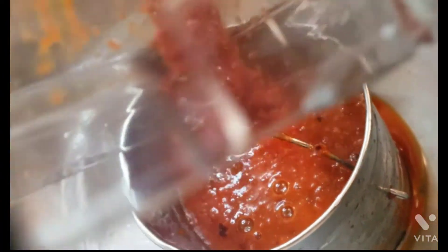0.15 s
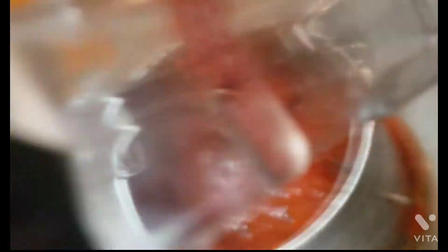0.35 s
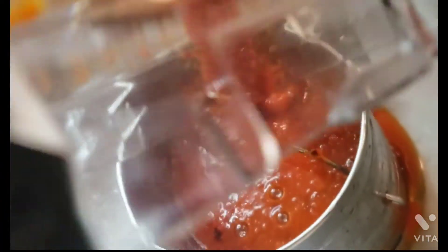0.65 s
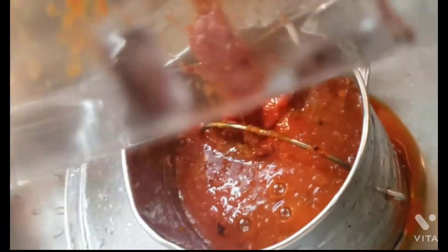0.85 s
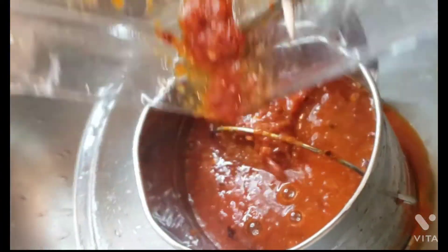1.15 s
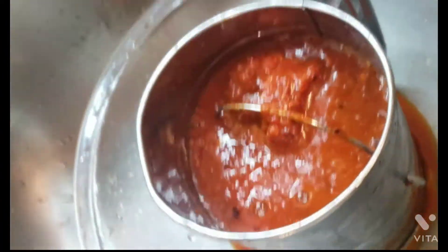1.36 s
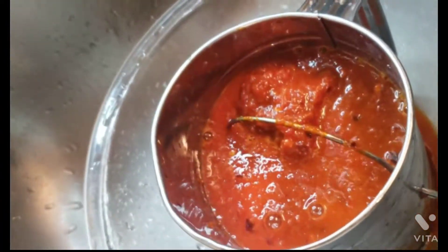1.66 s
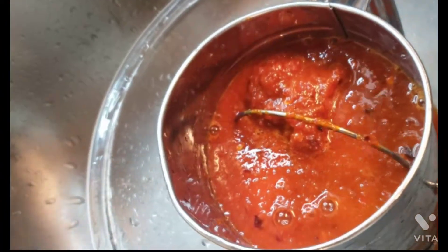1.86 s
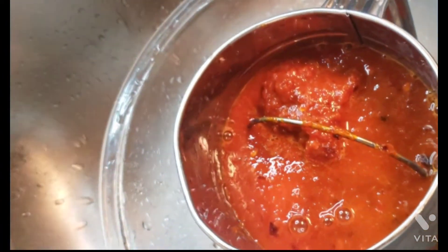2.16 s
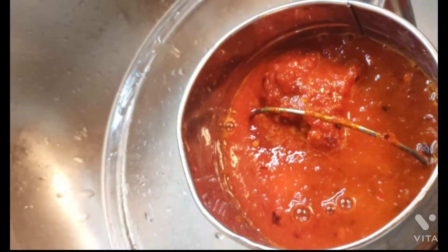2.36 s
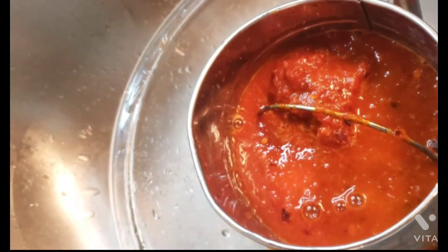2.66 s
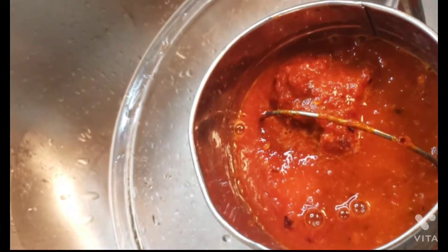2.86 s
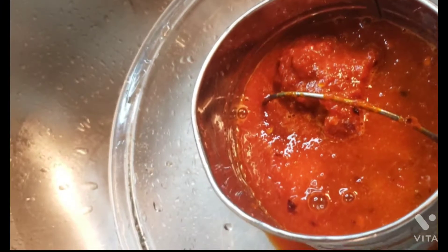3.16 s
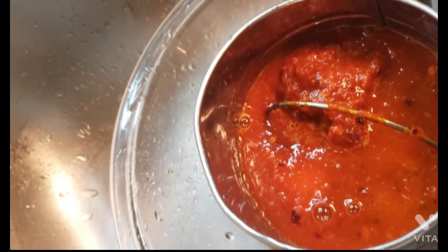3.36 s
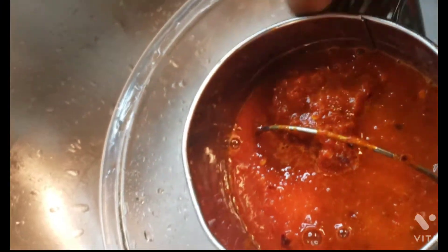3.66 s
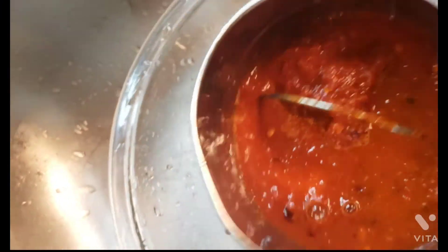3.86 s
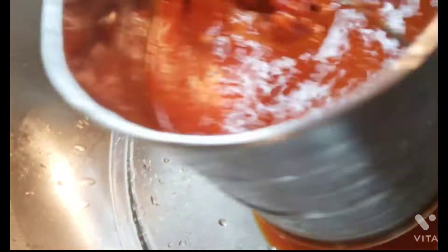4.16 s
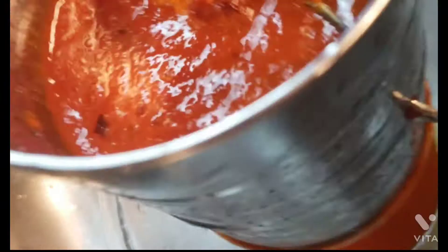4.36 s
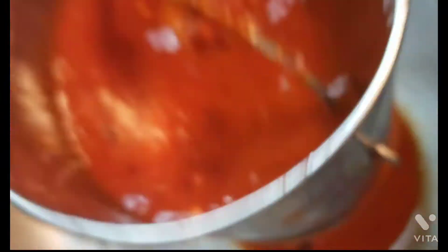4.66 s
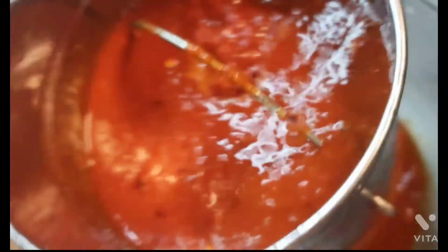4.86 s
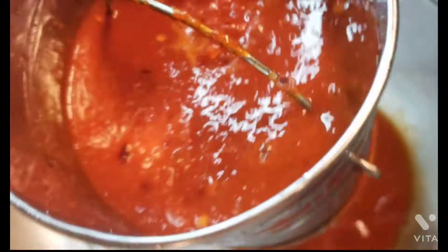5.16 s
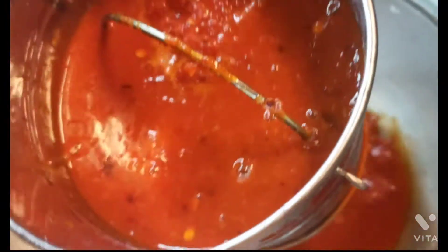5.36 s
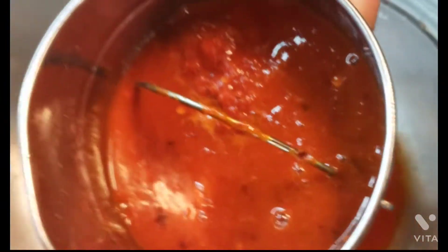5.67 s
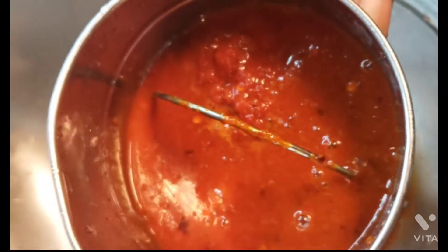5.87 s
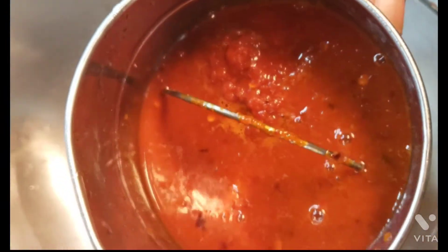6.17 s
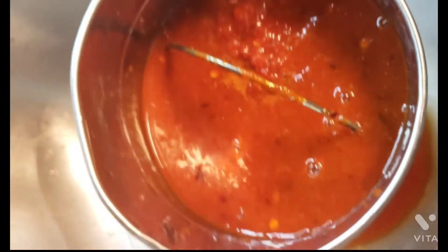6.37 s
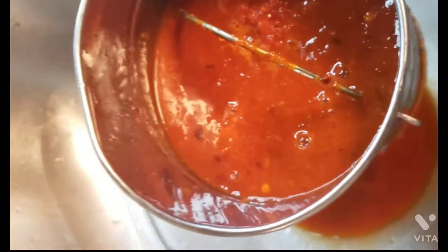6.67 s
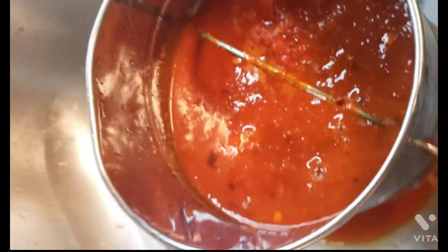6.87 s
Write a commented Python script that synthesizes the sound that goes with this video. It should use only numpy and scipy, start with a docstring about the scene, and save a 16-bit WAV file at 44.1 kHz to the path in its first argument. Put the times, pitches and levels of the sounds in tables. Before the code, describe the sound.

A steady fan-like hum and soft hiss fill a small, hard kitchen, with everything heard close. A low bump comes at the very start, and until about 1.2 seconds thick puree slides from a plastic blender jar into a metal sifter in four soft, wet rushes. At 1.3 seconds the jar lands loudly with a hollow clack and a boom from the counter. From 2.7 seconds it scrapes and knocks several times, hardest just before 3, then rocks to rest with a low rumble by 3.4. At 3.9 a glass bowl bumps the steel sink once and both ring briefly. From 4 to 5.4 seconds, as the sifter is lifted, small air pockets pop with rising plips among sticky snaps, fine crackle and faint fizz. One high plip follows at 6 seconds, and another cluster of pops and snaps comes from 6.5 to 6.8.

```python
"""Over the hum of a kitchen, thick puree slides in wet rushes from a plastic blender jar into a metal
sifter on a glass bowl in the sink, with a few soft low bumps. The jar is put down and the counter booms.
Puree starts to ooze through the mesh, and the jar scrapes, knocks and rocks to rest.
The bowl bumps the steel sink once and both ring. Last, the sifter is lifted: air pockets pop and
sticky films snap in its mesh."""
import sys
import numpy as np
from scipy import signal
from scipy.fft import rfft, irfft
from scipy.io import wavfile
from scipy.ndimage import uniform_filter1d

SR = 44100
rng = np.random.default_rng(int(sys.argv[2]) if len(sys.argv) > 2 else 0)


def master(y):
    """Save y as 16-bit WAV."""
    cut = np.clip(np.atleast_2d(y).T, -1, 1)
    pcm = np.round(cut * 32767)  # scale
    wavfile.write(sys.argv[1], SR, pcm.astype(np.int16))


N = 309449


def amp(db):
    """Turns decibels into a gain; amp(-60 * t / t60) fades by 60 dB in t60 seconds."""
    return 10 ** (np.asarray(db) / 20)


def evened(x):
    """Scales a signal to an average strength (rms) of 1."""
    return x / np.sqrt(np.mean(x ** 2) + 1e-20)


def read(points, hz):
    """Reads between the points of a curve, on a log-frequency axis."""
    f, value = np.transpose(points)
    return np.interp(np.log(hz + 1), np.log(f + 1), value)


def add(mix, s, sound):
    """Adds a sound to the stereo mix at s seconds."""
    part = mix[:, max(round(s * SR), 0):][:, :sound.shape[-1]]
    part += sound[..., :part.shape[1]]


def seconds(length):
    """The time of each sample."""
    return np.arange(int(length * SR)) / SR


def boost(peaks, hz):
    """The lift in dB that narrow resonances give each frequency."""
    return sum(db / (1 + (2 * (hz - f) / width) ** 2) for f, width, db in peaks)


def grainy(size, rough):
    """A level that flutters very fast, as tiny slips and bursts come and go."""
    return evened(np.exp(rough * evened(uniform_filter1d(rng.standard_normal(size), 70))))


# how alike left and right are: f/Hz, likeness (1 = the same)
LIKENESS = [(60, 0.96), (200, 0.99), (380, 0.81), (700, 0.57), (1300, 0.11), (4400, 0.038), (8000, 0.41),
            (15000, 0.74)]
def noise(colour, size, tilt_db=0):
    """Stereo noise; colour sets each frequency's relative level, tilt_db adds treble per octave."""
    hz = np.fft.rfftfreq(size, 1 / SR)
    a, b = rfft(rng.standard_normal((2, size)))
    same = np.clip(read(LIKENESS, hz), -1, 1)
    mid, side = a * np.sqrt(1 + same), b * np.sqrt(1 - same)
    gain = amp(read(colour, hz) + tilt_db * np.log2(hz / 1000 + 1))
    return evened(irfft(np.array([mid + side, mid - side]) * gain, size))


def ring(modes, t, spread_hz, alternate=False):
    """A struck object's own fading tones (modes); high ones reach the two sides out of step."""
    hz, db, t60 = np.transpose(modes)[:, :, None]
    shift = np.minimum(hz / spread_hz, .9) * rng.choice([-1, 1], hz.shape)
    sign = (-1) ** np.arange(len(hz))[:, None] if alternate else 1  # a shell's tones start opposed
    fade = sign * amp(db - 60 * t / t60)
    sides = [fade * np.sin(2 * np.pi * hz * t + side * shift) for side in (1, -1)]
    return np.sum(sides, 1) / amp(db).sum()


# colour of the kitchen air: f/Hz, level/dB
AIR_COLOUR = [(20, -25), (55, -5.5), (130, 0.5), (280, -6.5), (355, -13.5), (480, -5.5), (700, -8.5),
              (1300, -15.5), (2100, -18), (2900, -21.5), (4500, -23.5), (6200, -30.5), (9000, -34),
              (13000, -31.5), (15000, -36), (16500, -31)]
# its resonances: f/Hz, width/Hz, boost/dB
AIR_PEAKS = [(121, 9.7, 4.5), (238.7, 15, 6.5), (433, 34, 11.5), (495, 36, 4.5), (672, 62, 3.5),
             (814, 125, -5), (1018, 160, 4.5), (1503, 110, 4), (1970, 85, 7)]
# how the fan-like hum, the hiss and the mains hum drift: t/s, level/dB
HUM_LEVEL = [(0, -44.5), (1.1, -45.5), (1.6, -48.5), (2.7, -48.5), (4.2, -52), (5.3, -50), (6.4, -44.5)]
HISS_LEVEL = [(0, -56.5), (1.5, -57.5), (2.7, -57.3), (3.4, -60), (4.4, -59.7), (5.3, -58.7), (5.7, -56.3),
              (6.2, -56), (6.9, -54.7)]
MAINS_LEVEL = [(0, -53), (1.5, -64), (3.8, -63), (4.5, -56), (6.8, -48)]
def kitchen_air(hum_gain_db=5, split_hz=2500, mains_hz=60, whine_hz=2007, whine_db=-62):
    """A fan-like hum, a soft hiss, the low note of mains power and a thin wavering whine."""
    t, hz = np.arange(N) / SR, np.fft.rfftfreq(N, 1 / SR)
    spectrum = rfft(noise(AIR_COLOUR, N)) * amp(boost(AIR_PEAKS, hz))
    low = 1 / (1 + (hz / split_hz) ** 4)
    hum = evened(irfft(spectrum * low, N)) * amp(np.interp(t, *np.transpose(HUM_LEVEL)) + hum_gain_db)
    hiss = evened(irfft(spectrum * (1 - low), N)) * amp(np.interp(t, *np.transpose(HISS_LEVEL)))
    mains = evened(np.sin(2 * np.pi * mains_hz * t)) * amp(np.interp(t, *np.transpose(MAINS_LEVEL)))
    waver = evened(np.interp(t, np.linspace(0, t[-1], 40), rng.standard_normal(40)))
    whine = np.sin(2 * np.pi * np.cumsum(whine_hz + 1.215 * waver) / SR) * amp(2.6 * waver[::-1])
    return hum + hiss + mains + amp(whine_db) * evened(whine)


# colour of sliding puree: f/Hz, level/dB
RUSH_COLOUR = [(200, -4), (700, 2.5), (1300, 2), (2200, 0), (5000, 1), (6400, -4), (7800, -7), (8700, -13),
               (10500, -8), (12300, -4), (15000, -9), (16500, -14)]
# resonances of the jar under it: f/Hz, width/Hz, boost/dB
RUSH_PEAKS = [(2780, 180, 3), (3550, 240, 4), (4680, 260, 4), (5450, 220, 4), (10600, 300, 4)]
# slides: t/s, level/dB, swell/s, t60/s, tilt/(dB per octave), main resonance/Hz, its boost/dB
RUSHES = [(0, -43, .004, .8, -4, 4500, 3), (0.304, -32, .003, .66, 2.4, 7650, 9),
          (0.835, -33.5, .005, 0.67, .2, 4650, 5), (1.034, -33, .009, .92, -1.8, 1230, 3)]
def puree_rushes(rough=.2, patchy_db=2.6, dulling_db_per_s=30):
    """Each slide of puree is a quick swell of grainy hiss that shimmers as it dulls and dies."""
    out, t = np.zeros((2, N)), seconds(1)
    for s, db, swell, t60, tilt_db, peak_hz, peak_db in RUSHES:
        hz, age, spectra = signal.stft(noise(RUSH_COLOUR, len(t), tilt_db), SR, nperseg=512)
        patches = uniform_filter1d(rng.standard_normal(spectra.shape[1:]), size=4, axis=0)
        patches = evened(uniform_filter1d(patches, size=7, axis=1))  # resonances that come and go
        peaks_db = boost(RUSH_PEAKS + [(peak_hz, 380, peak_db)], hz)[:, None]
        dulling_db = dulling_db_per_s * np.outer(hz / 10000, age)  # the rate holds at 10 kHz
        spectra *= amp(peaks_db - dulling_db + patchy_db * patches)
        hiss = signal.istft(spectra, SR, nperseg=512)[1][:, :len(t)]
        envelope = amp(db - 60 * t / t60) * (1 - np.exp(-t / swell))
        add(out, s, hiss * grainy(len(t), rough) * envelope)
    return out


# low bumps: t/s, level/dB, f/Hz, half length/s, right side against left/dB
BUMPS = [(0.042, -5.5, 102, 0.02, -27), (0.286, -35, 62, .05, -7), (0.431, -27, 62, 0.042, -8)]
def soft_bumps():
    """Each bump is a few slow swings of air pressure, mostly on the left."""
    out = np.zeros((2, N))
    for s, db, hz, half, right_db in BUMPS:
        t = seconds(2 * half) - half
        push = -np.sin(2 * np.pi * hz * t) * np.exp(-(3.3 * t / half) ** 2)
        add(out, s - half, amp([[db], [db + right_db]]) * push)
    return out


def snap(tilt_db=0, count=3, tear_s=.014, after_db=-11, swell_s=.0003, t60=.022):
    """A film of puree tears with a bright tick and a few smaller ones."""
    t = seconds(.064)
    colour = [(1000, -30), (2700, -11), (5000, -8), (9000, -9), (12500, 0), (16000, -4)]
    hiss = noise(colour, len(t), tilt_db)
    starts = np.append(0, rng.uniform(0, tear_s, count))[:, None]
    age = np.maximum(t - starts, 0)
    sizes = amp([0] + [after_db] * count)[:, None]
    envelopes = sizes * amp(-60 * age / t60) * (1 - np.exp(-age / swell_s))
    return hiss * np.linalg.norm(envelopes, axis=0)


# tearing films: t/s, level/dB, tilt/(dB per octave)
SNAPS = [(0.5277, -37, -1), (1.2301, -40, -2), (1.931, -36, 1), (3.562, -44, -3), (3.808, -43, 0),
         (3.9509, -40, -6), (4.0632, -42, -4), (4.0786, -39, -3), (4.1011, -40, -5), (4.142, -42, -7),
         (4.2931, -39, -1), (4.3624, -40, 0), (4.4812, -42, -4), (4.5245, -35, -2), (4.5654, -42, 0),
         (4.5925, -29, 3), (4.6304, -31, 0), (4.6573, -35, -2), (4.6803, -33, 2), (5.03, -41, 1),
         (5.335, -39, 2), (6.6967, -38, 1), (6.7371, -30, 7), (6.7555, -27, 0)]
def film_snaps(gain_db=-2.5):
    """Sticky films snap with no air pocket behind them, so they have no note."""
    out = np.zeros((2, N))
    for s, db, tilt_db in SNAPS:
        add(out, s, amp(db + gain_db) * snap(tilt_db))
    return out


# the counter's tones: f/Hz, relative level/dB, t60/s
COUNTER_MODES = [(147, 0.5, 0.24), (82, -8, 0.21), (108.6, -5.5, 0.24), (164.6, -9.5, 0.25), (212, 0, .16),
                 (240.4, -10, 0.21)]
def counter_thud(t, contact_s, off_centre, lowest_hz=72):
    """The counter booms; a blow at its centre wakes mainly one tone, and a long contact dulls it."""
    modes = np.array(COUNTER_MODES, float)
    modes[1:, 1] += 20 * np.log10(max(off_centre, .01))
    force = np.sin(np.pi * (seconds(contact_s) + 1 / SR) / contact_s) ** 2
    boom = signal.fftconvolve(ring(modes, t, spread_hz=2300), force[None] / force.sum(), axes=1)
    bass_cut = signal.butter(3, lowest_hz, "high", fs=SR, output="sos")  # the slab gives no deep bass
    return signal.sosfilt(bass_cut, boom)


# the jar's tones: f/Hz, relative level on its edge/dB, relative level landing flat/dB, t60/s
JAR_MODES = [(340, -10, -8.5, .13), (480, -14, -8, .11), (690, -14, -7, .06), (851, -18, -8, .05),
             (980, -17, -8, .03), (1206, -14, -8, .04), (1420, -7, -8, .035), (1530, -6, 0, .04),
             (1650, 0, -12, .042), (1870, -4, -10, .04), (2270, -9, 0, .03), (2580, -5, 1, .028),
             (2900, -12, -2, .024), (3300, -7, -17, .03), (4000, -10, -14, .035), (4780, -10, -13, .045),
             (6500, -14, -20, .03), (10800, -12, -13, .016), (12600, -11, -11, .016), (14200, -9, -7, .014),
             (15400, -10, -12, .016)]
def jar_clack(t, flat, swell_s=.0004):
    """The jar rings hollow when struck on its edge, harder when it lands flat."""
    modes = [(hz, edge_db + flat * (flat_db - edge_db), t60) for hz, edge_db, flat_db, t60 in JAR_MODES]
    tones = ring(modes, t, spread_hz=3000, alternate=True)
    return tones * grainy(len(t), rough=.45) * (1 - np.exp(-t / swell_s))


# colour of plastic grating on the counter: f/Hz, level/dB
GRIT_COLOUR = [(40, -8), (120, -1.5), (450, -1), (850, 4), (1500, 0), (2200, -5.5), (3200, -6),
               (4500, -4.5), (6000, -15.5), (9500, -23), (13500, -17), (16000, -20)]
def grit(t, tilt_db, swell_s=.0007, t60=.04, rough=.36):
    """Two hard surfaces rasp briefly as they meet."""
    envelope = amp(-60 * t / t60) * (1 - np.exp(-t / swell_s))
    return noise(GRIT_COLOUR, len(t), tilt_db) * grainy(len(t), rough) * envelope


# landings: t/s, thud level/dB, thud delay/s, contact/s, off-centre (0-1), clack level/dB,
# flatness (0-1), grit level/dB, grit swell/s, grit tilt/(dB per octave)
KNOCKS = [ (1.2933, -.5, .0015, .005, .9, -4, 0., -24, .0007, 2),
          (2.7460, -36, .004, .005, .5, -24, .5, -17.5, .002, 3.5),
          (2.7600, -18, .003, .0058, .48, -31, .8, -33, .001, 1),
          (2.8580, -22, .002, .0021, .9, -15.5, .6, -14, .0015, 1.5),
          (2.8670, -15, .001, .0027, 1., -24, .6, -18, .002, -1),
          (2.9020, -11, .003, .0056, 1., -30, .5, -28, .002, 0),
          (2.9535, 1.3, .0055, .0036, .9, -1, 1., -19, .0007, -2),
          (3.1275, -24, .004, .0035, .7, -24, .6, -37, .0007, 0)]
def jar_knocks(gain_db=3):
    """Each time the jar lands, it clacks, rasps and sets the counter booming."""
    out, t = np.zeros((2, N)), seconds(.54)
    for s, thud_db, delay, contact_s, off_centre, clack_db, flat, grit_db, swell_s, tilt_db in KNOCKS:
        add(out, s + delay, amp(thud_db + gain_db) * counter_thud(t, contact_s, off_centre))
        add(out, s, amp(clack_db + gain_db) * jar_clack(t, flat))
        add(out, s, amp(grit_db) * grit(t, tilt_db, swell_s))
    return out


# colour of wet fizz: f/Hz, level/dB
SEEP_COLOUR = [(500, -45), (1800, -22), (2700, -9), (4500, -8), (7000, -10), (9500, -7), (12000, -1),
               (14000, 0), (16000, -4)]
# moments of fastest flow: t/s, half width/s, level/dB, tilt/(dB per octave)
SEEPS = [(2.2, .2, -66, 1), (3.6, .05, -62, 0), (3.73, .08, -59, 0), (4.07, .05, -64, -5),
         (4.62, .08, -60, -1), (6.4, .1, -58, -11), (6.52, .07, -59, -1), (6.69, .06, -54, -17)]
def puree_seeps(rough=.5):
    """Puree oozes through the mesh in soft swells of fine fizz."""
    out = np.zeros((2, N))
    for s, half, db, tilt_db in SEEPS:
        t = seconds(4 * half) - 2 * half
        fizz = noise(SEEP_COLOUR, len(t), tilt_db) * grainy(len(t), rough)
        add(out, s - 2 * half, amp(db) * fizz * np.exp(-(t / half) ** 2))
    return out


# colour of the counter shaking under a skid: f/Hz, level/dB
JUDDER_COLOUR = [(40, -22), (90, -5), (300, -1), (400, -10), (490, -1), (590, -10), (720, -1), (950, 0),
                 (3000, -45)]
# fastest moment of each skid: t/s, level/dB
SKIDS = [(2.755, -35), (2.870, -28), (2.912, -29.5), (2.965, -31.5), (3.0, -33.5)]
def jar_skids(rise_db_per_s=600, fall_db_per_s=260, rough=.42, touch_s=.008, judder_db=-1):
    """The jar grates on the counter in short skids that start quickly and brake slowly."""
    t = np.arange(N) / SR
    levels_db = [db - np.maximum((s - t) * rise_db_per_s, (t - s) * fall_db_per_s) for s, db in SKIDS]
    touching = np.clip(1 + (t - SKIDS[0][0]) / touch_s, 0, 1)
    scrape = noise(GRIT_COLOUR, N) + amp(judder_db) * noise(JUDDER_COLOUR, N)
    return touching * amp(np.max(levels_db, axis=0)) * scrape * grainy(N, rough)


# colour of the counter's rumble: f/Hz, level/dB
ROLL_COLOUR = [(40, -36), (90, -19), (120, -7), (143, 0), (170, -6), (220, -18), (600, -52), (2000, -85)]
# rolls: t/s, level/dB, length/s
ROLLS = [(2.757, -28, .05), (3.030, -32, .06), (3.126, -24.5, .068), (3.198, -37, .04), (3.236, -29, .06),
         (3.293, -31, .052)]
def jar_rolls(skew=.75):
    """The jar rocks to rest; each roll on its rim is a rounded swell of low rumble."""
    out = np.zeros((2, N))
    for s, db, length in ROLLS:
        t = seconds(length)
        wave = signal.hilbert(noise(ROLL_COLOUR, SR))[:, :len(t)]  # abs(wave) is its strength
        rumble = wave.real / (abs(wave) + .5)  # evens out the rumble so each roll is one smooth swell
        add(out, s, amp(db) * evened(rumble * np.sin(np.pi * (t / length) ** skew)))
    return out


# tones of the glass bowl and the steel sink: f/Hz, relative level/dB, t60/s
BOWL_MODES = [(463, -14, .1), (507, -1.5, .2), (522, -20, .35), (561, -19, .7), (640, -14, 0.12),
              (740, -2, 0.07), (950, -4, 0.05), (1350, -17, .06), (1685, -16, 0.11), (2540, -19, .05),
              (4060, -35, .6), (4597, -25, 0.12), (6000, -18, .04), (6900, -19, .04), (8258, -17, 0.033),
              (10500, -16, .03)]
SINK_MODES = [(80, -14, .12), (155, -13, .22), (225, 1, .12), (305, -5, .14), (370, -13, .12)]
def bowl_knock(s=3.8785, glass_db=-5.5, grit_db=-26, steel_db=-9, steel_delay_s=.005):
    """The bowl bumps the sink: the glass rings first, then the steel answers."""
    out, t = np.zeros((2, N)), seconds(.54)
    glass = ring(BOWL_MODES, t, spread_hz=3200) * (1 - np.exp(-t / .00098))
    add(out, s, amp(glass_db) * glass + amp(grit_db) * grit(t, tilt_db=3))
    steel = ring(SINK_MODES, t, spread_hz=3200, alternate=True) * (1 - np.exp(-t / .002))
    add(out, s + steel_delay_s, amp(steel_db) * steel)
    return out


def bubble(hz, glide=1.6, overtone_ratio=1.48, tone_db=-5.5, wet_db=-8, rough=.3, swell_s=.0005):
    """An air pocket opens and rings with a short rising plip, smeared by the thick pulp."""
    t = seconds(.064)
    phase = 2 * np.pi * hz * (t + glide * t ** 2)
    overtone_gain = amp(-13) / (1 + (hz * overtone_ratio / 8000) ** 8)  # pulp soaks it up above 8 kHz
    sides = rng.uniform(-.68, .74, (2, 1))
    tone = np.sin(phase + sides) + overtone_gain * np.sin(overtone_ratio * phase - sides)
    smear = noise([(hz * .5, -55), (hz * .8, -13), (hz, 0), (hz * 1.2, -17), (hz * 1.6, -48)], len(t))
    t60 = .04 * (3000 / hz) ** .6  # small, high pockets die sooner
    envelope = amp(-60 * t / t60) * (1 - np.exp(-t / swell_s))
    return (amp(tone_db) * tone + amp(wet_db) * smear) * grainy(len(t), rough) * envelope


# the clearest bubbles: t/s, level/dB, starting f/Hz, snap against that level/dB
BUBBLES = [(4.142, -42, 3400, -8), (4.2153, -44, 3420, -15), (4.3715, -35, 3950, -11),
           (4.5002, -37, 2410, -12), (4.5271, -34, 4640, -5), (4.5685, -33, 2730, -15),
           (4.569, -38, 5200, -14), (4.6314, -30.5, 4640, -12), (4.7142, -32, 2630, -18),
           (4.7586, -43, 7420, -5), (4.798, -44, 3860, -15), (4.8973, -39, 5780, -12),
           (5.0898, -41, 2960, -20), (5.1345, -43, 4600, -5), (5.1412, -25.5, 2950, -22),
           (5.2074, -47, 6580, -20), (5.2465, -41, 6500, -15), (5.3063, -43, 2750, -5),
           (5.308, -43, 4480, -15), (5.3497, -38.5, 2900, -10), (6.0195, -30.5, 7450, -35),
           (6.5394, -43, 8460, -10), (6.5914, -33.5, 2960, -30), (6.6024, -30, 2260, -30),
           (6.6987, -39, 2800, -20), (6.7974, -42, 7930, -15)]
def bubble_pops(ring_gain_db=2.5):
    """Bubbles burst in the mesh: the film snaps and the air behind it rings."""
    out = np.zeros((2, N))
    for s, db, hz, film_db in BUBBLES:
        add(out, s, amp(db + ring_gain_db) * bubble(hz))
        add(out, s, amp(db + film_db) * snap())
    return out


# moments when the sifter moves most: t/s, half width/s, extra rate/(ticks per s)
LIFTS = [(4.5, .6, 150), (6.65, .2, 70)]
def mesh_crackle(resting_per_s=2, ring_db=-60, ring_range_db=10, snap_db=-62, snap_range_db=12):
    """Puree parts from the mesh in faint random ticks, many more while the sifter is lifted."""
    out, t = np.zeros((2, N)), np.arange(N) / SR
    rate = resting_per_s + sum(ticks * np.exp(-((t - s) / half) ** 2) for s, half, ticks in LIFTS)
    times = t[rng.random(N) < rate / SR]
    for s, (pitch, strength, tear) in zip(times, rng.random((len(times), 3))):
        add(out, s, amp(ring_db + ring_range_db * strength ** 2) * bubble(hz=2400 * 3 ** pitch))
        add(out, s, amp(snap_db + snap_range_db * tear ** 2) * snap(tilt_db=-4))
    return out


# how long the room rings: f/Hz, t60/s
ROOM_DECAY = [(100, 0.51), (500, 0.4), (2000, .42), (8000, 0.25), (16000, .3)]
def with_echoes(x, near_db=-7, near_t60=.046, far_db=-17):
    """Adds quick echoes from the sink and counter, then the short tail of a hard room."""
    t = seconds(.6)
    late = rng.standard_normal((2, len(t))) * (t > .006)
    hz, age, spectra = signal.stft(late, SR, nperseg=256)
    spectra *= amp(-60 * age / read(ROOM_DECAY, hz)[:, None])
    tail = signal.istft(spectra, SR, nperseg=256)[1][:, :len(t)]
    near = rng.standard_normal(tail.shape) * (rng.random(tail.shape) < .04)
    near *= (t > .001) * amp(-60 * t / near_t60)
    echo = amp(near_db) * near / np.linalg.norm(near[0]) + amp(far_db) * tail / np.linalg.norm(tail[0])
    bass_cut = signal.butter(2, 450, "high", fs=SR, output="sos")  # bass arrives directly
    return x + signal.fftconvolve(x, signal.sosfilt(bass_cut, echo), axes=1)[:, :N]


def scene():
    """Mixes all the sounds; only the sharp ones get echoes."""
    soft = kitchen_air() + puree_rushes() + soft_bumps() + jar_rolls() + puree_seeps()
    sharp = jar_knocks() + bowl_knock() + jar_skids() + bubble_pops() + film_snaps() + mesh_crackle()
    return soft + with_echoes(sharp)


def record(dry, top_hz=16100):
    """Clips peaks at full scale, then cuts the very highest treble."""
    treble_cut = signal.firwin(301, top_hz, window=("kaiser", 9), fs=SR)
    return signal.oaconvolve(np.clip(dry, -1, 1), treble_cut[None], "same")


dry = scene()
out = record(dry)
master(out)
```